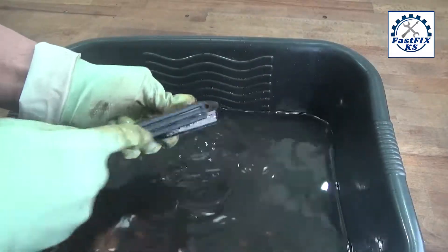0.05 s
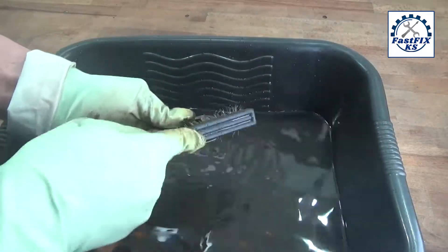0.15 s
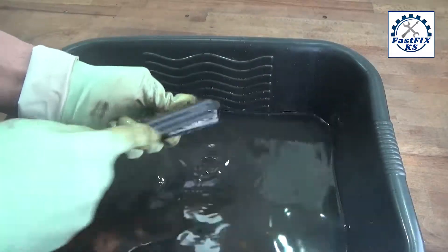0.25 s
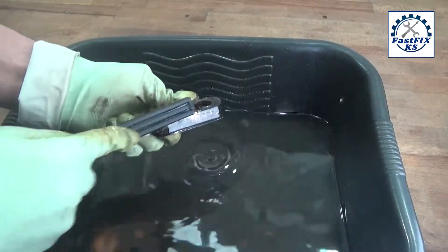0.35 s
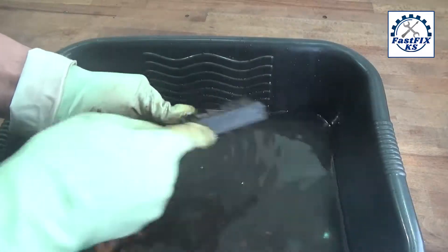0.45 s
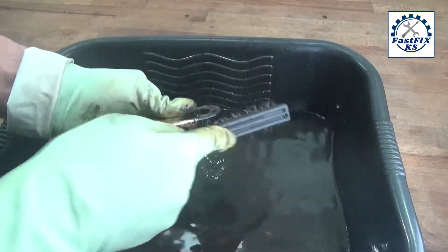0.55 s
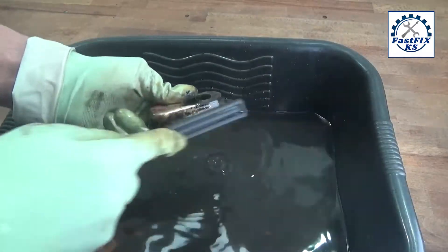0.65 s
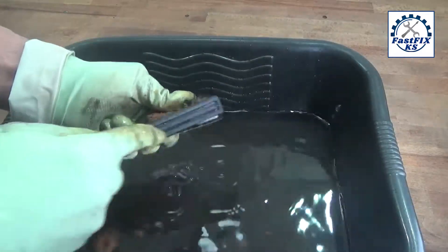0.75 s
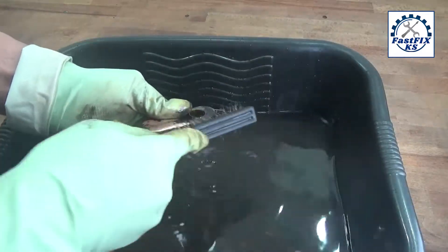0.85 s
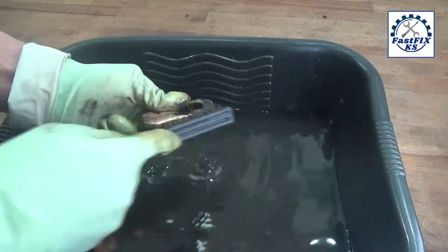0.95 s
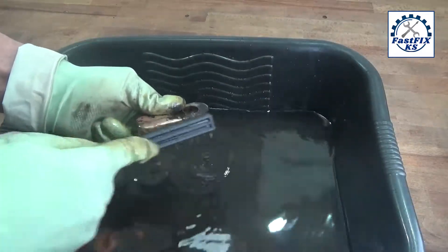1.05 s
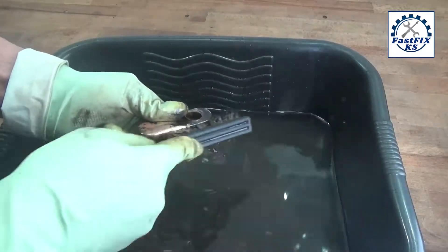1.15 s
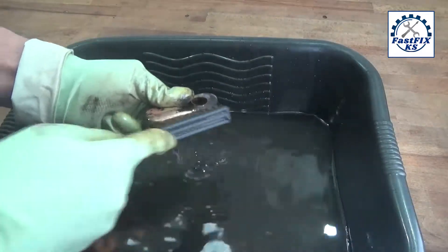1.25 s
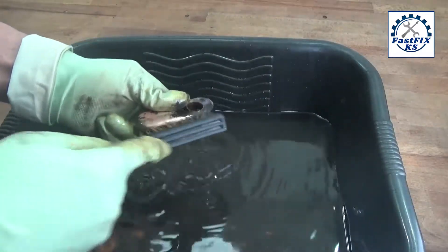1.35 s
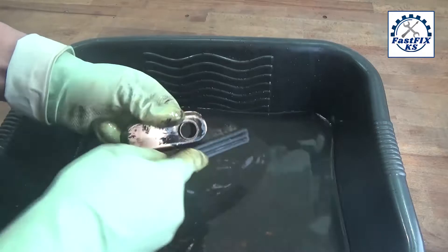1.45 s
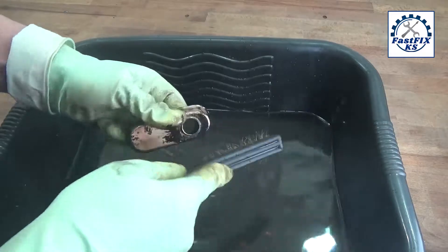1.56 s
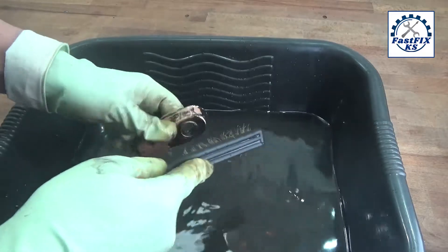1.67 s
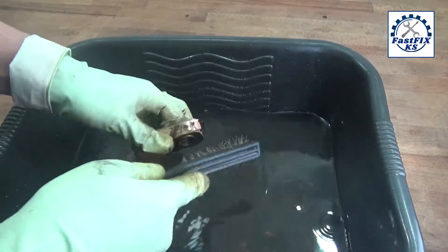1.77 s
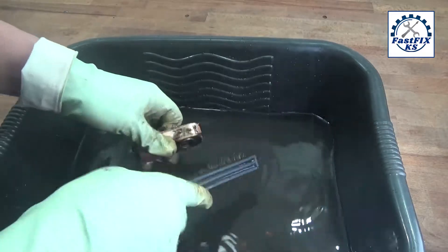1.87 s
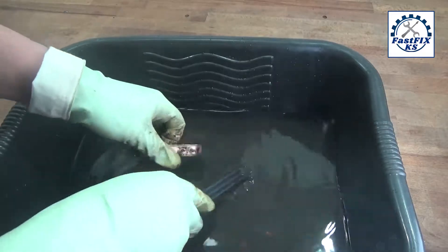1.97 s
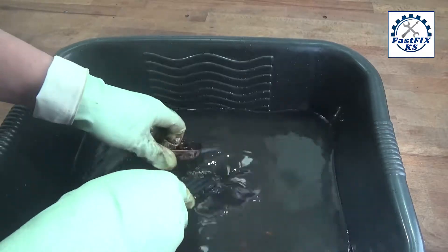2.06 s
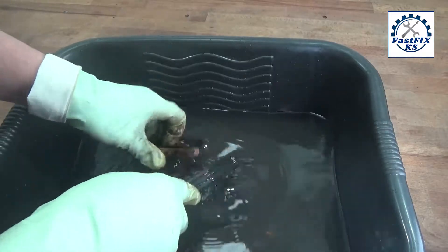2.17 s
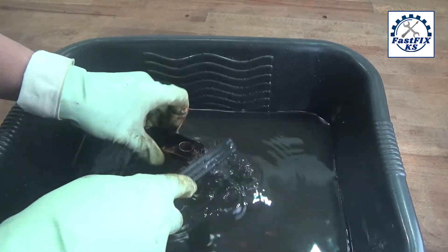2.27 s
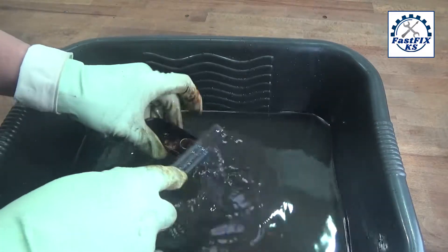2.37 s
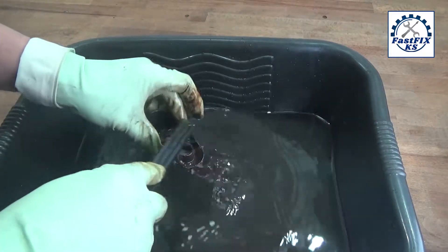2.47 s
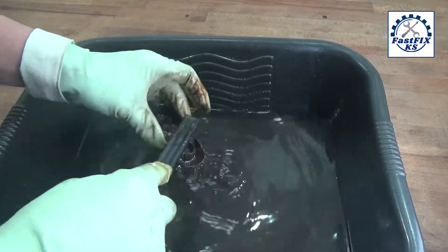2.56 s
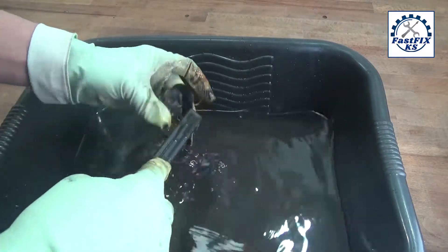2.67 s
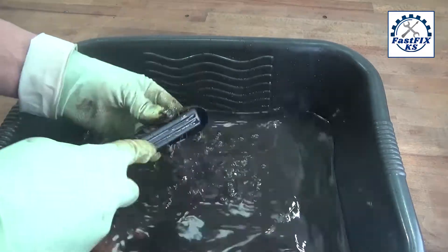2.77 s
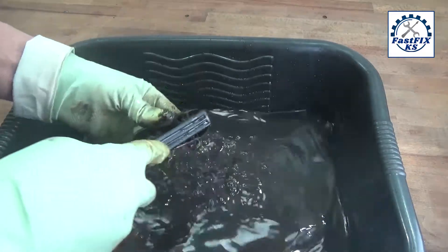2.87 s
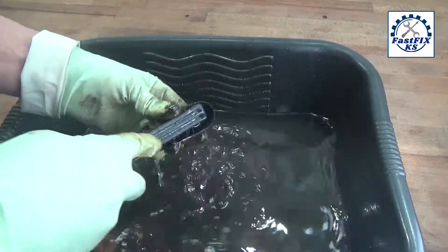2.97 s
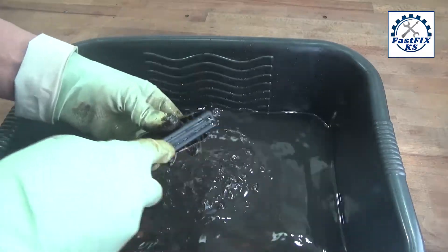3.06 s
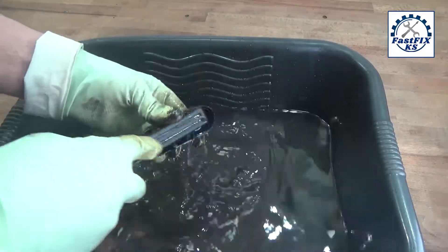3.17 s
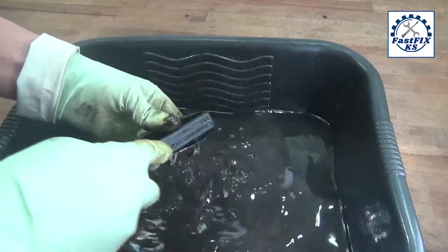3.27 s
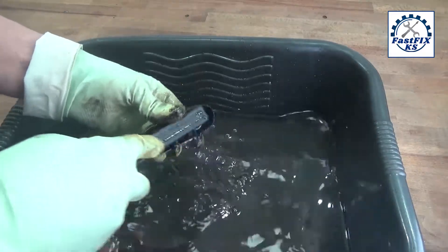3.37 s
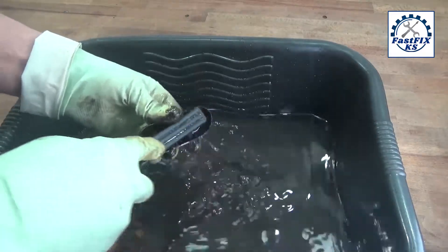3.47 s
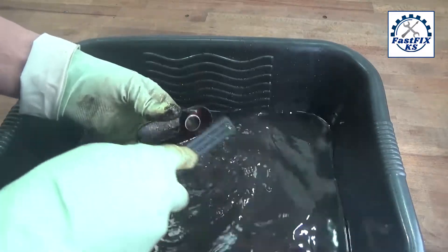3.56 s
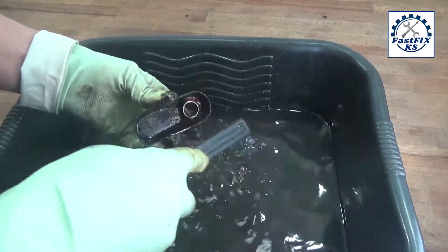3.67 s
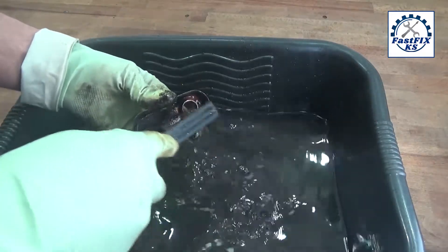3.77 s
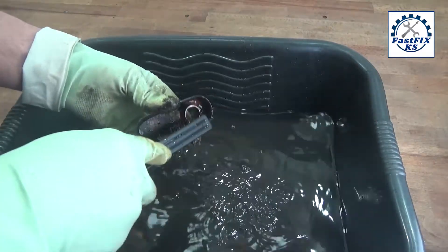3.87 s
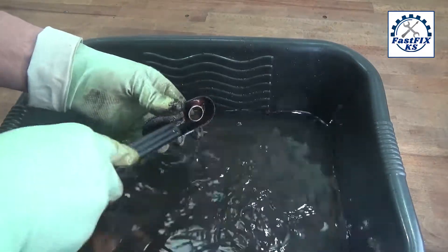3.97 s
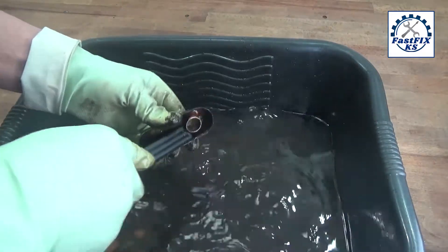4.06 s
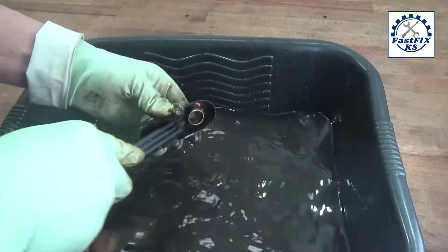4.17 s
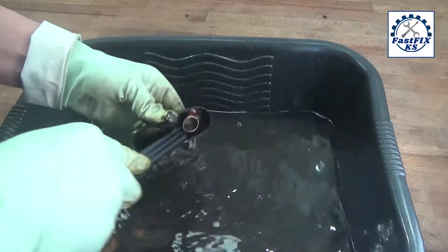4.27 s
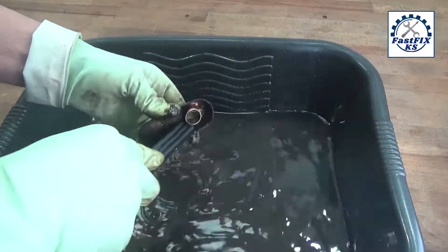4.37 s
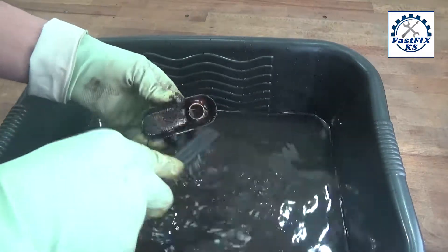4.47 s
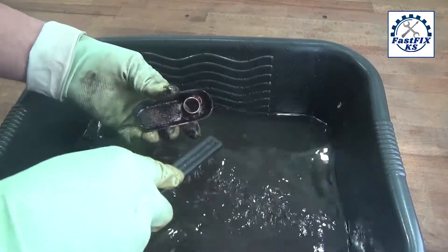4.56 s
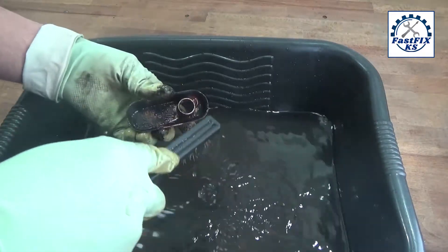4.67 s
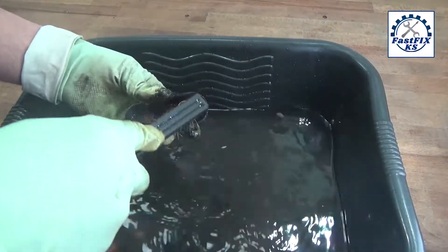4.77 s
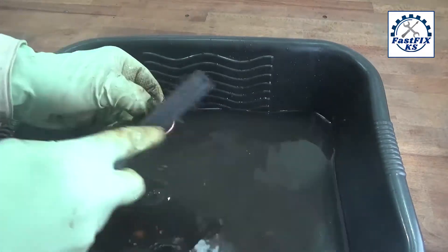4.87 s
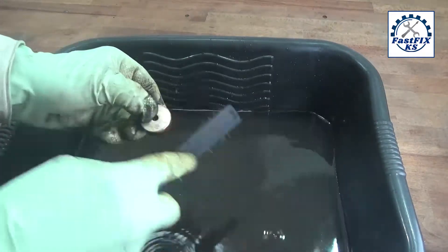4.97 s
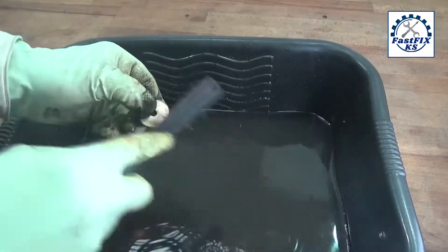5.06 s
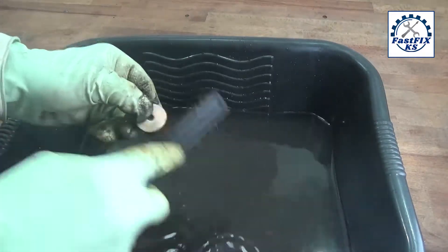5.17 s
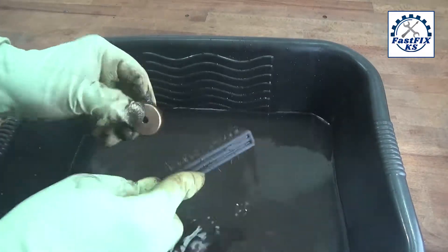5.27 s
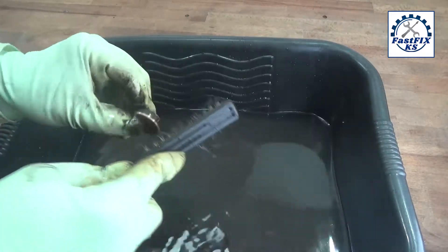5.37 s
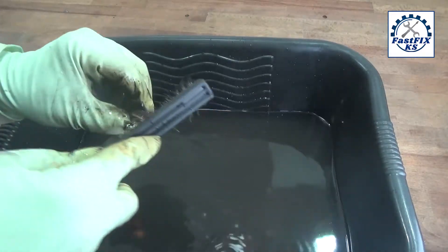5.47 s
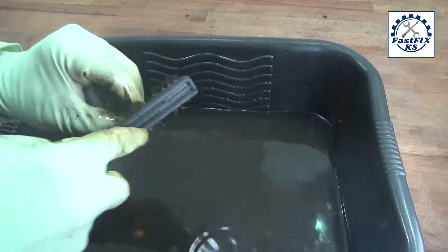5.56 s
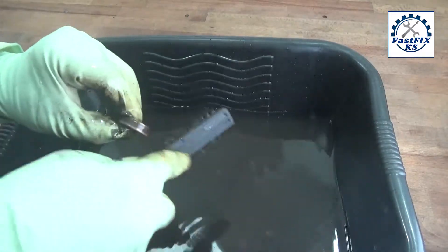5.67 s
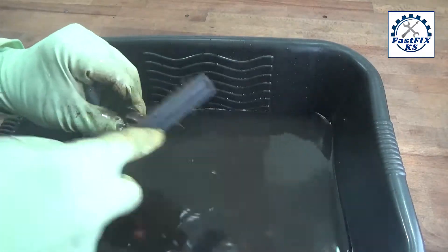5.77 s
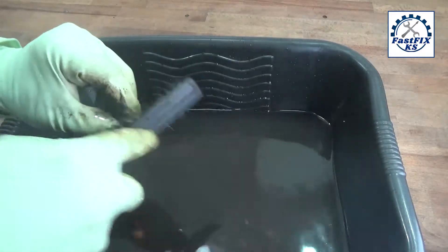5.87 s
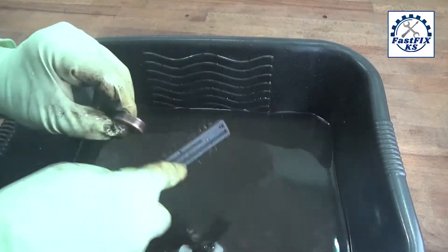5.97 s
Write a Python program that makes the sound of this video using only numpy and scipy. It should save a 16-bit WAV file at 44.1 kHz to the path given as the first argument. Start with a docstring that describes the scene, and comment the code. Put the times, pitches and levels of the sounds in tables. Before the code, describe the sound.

Close, dry scratching of wire bristles on rusty steel, with metallic knocks, brief watery blips and four bright separate scrapes at the end.

```python
"""Wire brush on rusty steel

Gloved hands scrub a steel lever with a wire brush over a plastic basin of water, close up in a small workshop.
Random wire flicks ring each part: the flat, the wet bored end, the rim, then four sweeps over a small washer,
with a faint, smooth glove rub between them. Short filtered bursts make the knocks; gliding tones the bubbles.
Filtered noise and tiny pings make water, gloves and bumps, over a short room tail and a faint hiss and hum."""
import sys
import numpy as np
from scipy import signal
from scipy.fft import rfft, irfft
from scipy.io import wavfile
from scipy.ndimage import map_coordinates

SR = 44100
rng = np.random.default_rng(int(sys.argv[2]) if len(sys.argv) > 2 else 0)


def unload_audio(sound):
    """Save the sound as a 16-bit wav file, at the path given as the first command line argument."""
    columns = np.transpose(np.atleast_2d(sound))
    # keep every value between -1 and 1, then stretch to whole-number steps
    steps = np.round(np.clip(columns, -1, 1) * 32767)
    wavfile.write(sys.argv[1], SR, steps.astype(np.int16))


N = 265482   # samples, about 6 s
TIME = np.arange(N) / SR


def scrub(gains, body, twangs, wander, twang_db, flicks_per_s, spread_db, tufts_per_s, tuft_db,
          hiss_trim_db, rasp_trim_db):
    """Wire tips catch on the rust and flick free, whole tufts at a time; the part rings with each flick."""
    flicks = grains(flicks_per_s, spread_db)
    # now and then a bent wire springs back and twangs at a pitch of its own
    wires = flicks / rms(flicks) + from_db(twang_db) * twangs
    tufts = from_db(tuft_db * flutter(tufts_per_s))
    scrape = waver(through(wires * tufts, body), wander, per_s=45)
    hiss = band(scrape, 4700, "high")
    rasp = band(scrape, 4700, "low")
    # fast travel brings out the hiss of the tips, hard pressing the rasp of the part
    travel, pressure = gains
    hiss = from_db(hiss_trim_db) * travel * hiss / rms(hiss)
    rasp = from_db(rasp_trim_db) * pressure * rasp / rms(rasp)
    return hiss + rasp


# In the tables of strokes, hiss is the high part of the scrape and rasp the low; scrub() trims both levels.
# strokes on the flat of the lever, then two faint, watery rustles before the bore strokes:
# start_s, length_s, hiss_db, rasp_db, hiss_fade_db (over the stroke)
FLAT_STROKES = [(-.04, 0.11, -24.5, -36, 6), (.079, 0.13, -23.5, -41.5, 12), (.238, 0.14, -21.5, -41.5, 20),
                (.398, 0.14, -34, -39, -0.5), (.764, 0.16, -29.5, -41, 6), (.951, 0.11, -29.5, -37.5, 3),
                (1.096, 0.11, -26, -36.5, 6.5), (1.244, 0.098, -27.5, -36, 4), (1.38, 0.16, -24, -35.5, 9),
                (2.578, 0.042, -37, -41, 7), (2.68, 0.075, -41, -40, -1)]
# colour of scraping on the flat: pitch_hz, level_db
FLAT_COLOUR = [(88, -36), (150, -40), (205, -27.5), (315, -29), (688, -16), (977, -16), (1720, -11),
               (3540, -6.5), (4140, -6.5), (4570, -6.5), (5770, -2.5), (6360, -1), (7440, 0.5), (9040, 0),
               (15900, -18)]
# resonances of the held flat: pitch_hz, width_hz, lift_db
FLAT_MODES = [(1310,54,6.5), (1740,210,5), (2500,14,7), (3020,88,7), (4170,120,4.5), (5840,240,6.5),
              (6920,130,0), (7100,59,-1), (7080,77,5), (7560,50,12), (8730,87,8.5), (9260,39,11.5)]


def brushed_flat(twangs):
    """The flat rings as the wires are pushed over it; two faint, watery rustles share its colour."""
    gains = strokes(FLAT_STROKES, attack_s=0.052, rasp_sag_db=2.0,
                    hiss_release_db_per_s=370, rasp_release_db_per_s=240)
    return scrub(gains, response(FLAT_COLOUR, FLAT_MODES), twangs, wander=0.00252, twang_db=-8,
                 flicks_per_s=14000, spread_db=3.5, tufts_per_s=260, tuft_db=0.8,
                 hiss_trim_db=-2.5, rasp_trim_db=-2.0)


# strokes on the wet bored end: start_s, length_s, hiss_db, rasp_db, hiss_fade_db (over the stroke)
BORE_STROKES = [(2.774, 0.064, -31.5, -31, 3), (2.866, 0.063, -37, -27.5, 3),
                (2.974, 0.067, -38, -31.5, -0.5), (3.073, 0.088, -34, -30, 2.5),
                (3.181, 0.075, -38, -28, -3.5), (3.285, 0.072, -35.5, -28.5, -3.5),
                (3.389, 0.085, -39.5, -29, -5.5), (3.505, 0.11, -34, -28, -4)]
# colour of scraping on the bored end, also used for knocked steel: pitch_hz, level_db
BORE_COLOUR = [(50,-36), (150,-27.5), (300,-25.5), (700,-17.5), (1400,-13), (1800,-2.5), (2400,4.5),
               (3050,-10.5), (4000,-4.5), (5400,-7), (6800,5), (9000,-5), (11000,-6), (13000,-11),
               (16000,-14)]
# resonances of the bored end: pitch_hz, width_hz, lift_db
BORE_MODES = [(1760,140,6), (2375,270,6.5), (2513,94,9.4), (2640,156,11.8), (3450,59,6.9), (4068,360,16.2),
              (6130,77,8.8), (7070,100,1.6), (9100,870,9.4)]


def brushed_bore(twangs):
    """The wet bored end rings strongly, its pitches wandering more than those of the flat."""
    gains = strokes(BORE_STROKES, attack_s=0.027, rasp_sag_db=4.0,
                    hiss_release_db_per_s=435, rasp_release_db_per_s=517, hollow_db=1.5)
    return scrub(gains, response(BORE_COLOUR, BORE_MODES), twangs, wander=0.014, twang_db=-7.0,
                 flicks_per_s=9000, spread_db=4.5, tufts_per_s=200, tuft_db=1.5,
                 hiss_trim_db=0.0, rasp_trim_db=0.5)


# strokes along the rim: start_s, length_s, hiss_db, rasp_db, hiss_fade_db (over the stroke)
RIM_STROKES = [(3.882, 0.015, -43.5, -47.5, 1), (3.941, 0.1, -38.5, -40.5, 1.5),
               (4.069, 0.044, -34.5, -33, 7), (4.197, 0.052, -39, -41.5, -3.5),
               (4.294, 0.091, -33, -40, 11.5), (4.452, 0.054, -40.5, -40.5, -7)]
# colour of scraping on the rim: pitch_hz, level_db
RIM_COLOUR = [(50,-30), (150,-34), (300,-25), (700,-13.5), (1150,-9.5), (1480,-11), (2300,-1.5), (3400,-5),
              (5400,-4), (8500,1), (11000,-6), (13000,-13), (16000,-17)]
# resonances of the rim: pitch_hz, width_hz, lift_db
RIM_MODES = [(1780,190,14), (2350,50,6.8), (2532,133,13.2), (2716,99,13.7), (4100,57,17.3), (6000,61,1.4),
             (7440,120,2), (8300,53,2)]


def brushed_rim(twangs):
    """Strokes along the rim ring at narrow resonances of their own."""
    gains = strokes(RIM_STROKES, attack_s=0.032, rasp_sag_db=-1.0,
                    hiss_release_db_per_s=308, rasp_release_db_per_s=200)
    return scrub(gains, response(RIM_COLOUR, RIM_MODES), twangs, wander=0.01784, twang_db=-6.5,
                 flicks_per_s=8000, spread_db=2.0, tufts_per_s=290, tuft_db=2.0,
                 hiss_trim_db=0.0, rasp_trim_db=0.5)


# four sweeps across the washer; the third of the five rows is a faint, smooth glove rub between them:
# start_s, time_to_full_speed_s, swell_s, hiss_db, rasp_db, landing_db
WASHER_SWEEPS = [(4.942, .076, 0.015, -24.5, -31, -34), (5.157, 0.084, 0.015, -25, -35, -39),
                 (5.385, 0.07, 0.034, -63, -51.5, -65), (5.598, 0.079, 0.023, -29.5, -34, -45.5),
                 (5.879, 0.078, 0.018, -29.5, -30.5, -38)]
# colour of scraping on the washer: pitch_hz, level_db
WASHER_COLOUR = [(88, -63), (150, -36), (503, -14.5), (555, -15), (977, -13), (1120, -6), (1530, -9),
                 (2010, -2), (2260, -6.5), (2540, -2), (3480, -6), (9220, 7.5), (13900, -1.5), (15900, -13)]
# resonances of the washer: pitch_hz, width_hz, lift_db
WASHER_MODES = [(1150,120,1.5), (2110,140,4.8), (2750,530,1.5), (4600,120,2.4), (6160,43,6.6),
                (6770,93,5.9), (7200,70,3.3), (9580,200,6)]


def swept_washer(twangs):
    """One-way sweeps make the small washer ring in quick swells; a faint glove rub shares its colour."""
    gains = sweeps(WASHER_SWEEPS, landing_s=.004, settle_db_per_s=336,
                   landing_rasp_db=-0.4, rasp_lead_s=0.014)
    return scrub(gains, response(WASHER_COLOUR, WASHER_MODES), twangs, wander=.004, twang_db=-10.0,
                 flicks_per_s=17000, spread_db=4.0, tufts_per_s=270, tuft_db=2.5,
                 hiss_trim_db=-2.7, rasp_trim_db=-0.7)


def push(s, length, attack_s, sag_db, release_db_per_s, hollow_db=0):
    """Gain of one push of the hand: it builds, sags (and eases midway) while it lasts, then dies away."""
    t = TIME - s
    travelled = np.clip(t / length, 0, 1)
    sag = sag_db * travelled   # a negative sag grows instead
    easing = hollow_db * np.sin(np.pi * travelled) ** 2
    release = release_db_per_s * np.maximum(t - length, 0)
    onset = np.sin(np.pi / 2 * np.clip(t / attack_s, 0, 1)) ** 2
    return onset * from_db(np.maximum(-sag - easing - release, -120))


def strokes(rows, attack_s, rasp_sag_db, hiss_release_db_per_s, rasp_release_db_per_s, hollow_db=0):
    """Gains of hiss and rasp for back-and-forth strokes; the hiss follows the speed of the hand."""
    hiss_power = rasp_power = 0
    for s, length, hiss_db, rasp_db, fade_db in rows:
        hiss_push = push(s, length, attack_s, fade_db, hiss_release_db_per_s, hollow_db)
        rasp_push = push(s, length, attack_s, rasp_sag_db, rasp_release_db_per_s, hollow_db)
        hiss_power = hiss_power + (from_db(hiss_db) * hiss_push) ** 2
        rasp_power = rasp_power + (from_db(rasp_db) * rasp_push) ** 2
    return np.sqrt(hiss_power), np.sqrt(rasp_power)


def sweeps(rows, landing_s, settle_db_per_s, landing_rasp_db, rasp_lead_s):
    """Gains for one-way sweeps: the brush lands, speeds up and lifts off; pressure peaks before speed."""
    hiss_power = rasp_power = 0
    for s, crest_s, swell_s, hiss_db, rasp_db, landing_db in rows:
        landing = from_db(landing_db) * push(s, landing_s, landing_s, 0, settle_db_per_s)
        touching = TIME > s
        past_crest = TIME - s - crest_s
        speed = touching * np.exp(-abs(past_crest) / swell_s)
        pressure = touching * np.exp(-abs(past_crest + rasp_lead_s) / swell_s)
        hiss_power = hiss_power + landing ** 2 + (from_db(hiss_db) * speed) ** 2
        landing_rasp = from_db(landing_rasp_db) * landing
        rasp_power = rasp_power + landing_rasp ** 2 + (from_db(rasp_db) * pressure) ** 2
    return np.sqrt(hiss_power), np.sqrt(rasp_power)


def waver(x, depth, per_s):
    """The water film and the pressing brush load the steel, so its resonances wander."""
    # reading slightly faster or slower bends every pitch; depth is the typical fraction of speed
    position = np.arange(N) + np.cumsum(depth * flutter(per_s))
    return map_coordinates(x, [position], mode="grid-wrap")


# brush and fingers knocking on the parts: start_s, steel_ring_db, wire_tick_db, dull_clack_db (before trims)
KNOCKS = [(.266, -48, -14, -50), (.542, -58, -10, -46), (.768, -46, -9.5, -36), (1.49, -45, -39, -11),
          (1.53, -42, -23, -8.5), (1.652, -55, -35, -29), (1.68, -41, -35, -27), (1.734, -41, -44, -12.5),
          (1.801, -39, -28, -47), (2.041, -40, -9.5, -23), (2.104, -21, -14.5, -22), (2.16, -55, -21, -52),
          (2.546, -29, -11.5, -44), (2.707, -30, -37, -22), (2.902, -24, -12, -37),
          (3.829, -34.5, -28.5, -62), (3.996, -11, -37, -40), (4.056, -24, -12, -28),
          (4.101, -21, -23, -20), (4.123, -20.5, -39, -8), (4.188, -34, -19, -32), (4.359, -14, -27, -17.5),
          (4.502, -15, -28, -28), (4.508, -13.5, -21, -13.5), (4.898, -46, -27.5, -33.5)]
# colour of the ticking wires: pitch_hz, level_db
TICK_COLOUR = [(60,-45), (300,-15), (1500,-35), (4000,0), (6500,13), (9000,14), (12000,3.5), (16000,-14.5)]
# colour of the clacking brush head: pitch_hz, level_db
CLACK_COLOUR = [(50,-33), (230,-40), (500,-7), (950,-8), (1850,7), (3000,10.5), (5000,-12), (16000,-56)]
# resonance of the brush head: pitch_hz, width_hz, lift_db
CLACK_MODES = [(1850,300,7.5)]


def knocks(rattle_db, rattle_t60_s, contact_hz, ring_trim_db, tick_trim_db, clack_trim_db):
    """A contact rings the steel, ticks the wires and clacks the brush head, with a brief rattle after it."""
    softened = signal.butter(2, contact_hz, fs=SR, output="sos")
    steel = signal.sosfilt(softened, response(BORE_COLOUR, BORE_MODES))
    wires = response(TICK_COLOUR)
    head = response(CLACK_COLOUR, CLACK_MODES)
    out, t = np.zeros(N), TIME[:len(wires)]
    for s, ring_db, tick_db, clack_db in [*KNOCKS, *bites(), *skitter(count=4)]:
        parts = ((steel, ring_db + ring_trim_db), (wires, tick_db + tick_trim_db),
                 (head, clack_db + clack_trim_db))
        for body, peak_db in parts:
            rattle = from_db(rattle_db - 60 * t / rattle_t60_s) * rng.standard_normal(len(t))
            # light touches hardly rattle
            contact = (t == 0) + rattle * from_db(0.34 * (tick_db + 17.5))
            hit = through(contact, body)
            add(out, s, from_db(peak_db) * hit / np.abs(hit).max())
    return out


# each bore stroke catches the near edge, then the far edge as it turns round;
# dB relative to the stroke's own table levels, before the knock trims
BITE_AFTER_S, BITE_RING_DB, BITE_TICK_DB, BITE_CLACK_DB = 0.023, 5, 14, -18
TURN_RING_DB, TURN_TICK_DB, TURN_CLACK_DB = 6, 19.5, -16


def bites():
    """Knocks of the brush against the edges of the bore, early in every stroke and at its end."""
    rows = []
    for s, length, hiss_db, rasp_db, fade_db in BORE_STROKES:
        rows.append((s + BITE_AFTER_S, rasp_db + BITE_RING_DB,
                     hiss_db + BITE_TICK_DB, rasp_db + BITE_CLACK_DB))
        rows.append((s + length, rasp_db + TURN_RING_DB,
                     hiss_db - fade_db + TURN_TICK_DB, rasp_db + TURN_CLACK_DB))
    return rows


# the wires skip off the dipping lever; levels of the first knock, before the knock trims
SKITTER_S, SKITTER_GAP_S, SKITTER_STEP_DB = 2.049, 0.0033, 0.8
SKITTER_RING_DB, SKITTER_TICK_DB, SKITTER_CLACK_DB = -46, -13, -27.5


def skitter(count):
    """A quick run of skipping knocks, each slightly louder than the last."""
    first = np.array([SKITTER_RING_DB, SKITTER_TICK_DB, SKITTER_CLACK_DB])
    return [(SKITTER_S + k * SKITTER_GAP_S, *(first + k * SKITTER_STEP_DB)) for k in range(count)]


def after_ring(s, hz, level_db, t60_s):
    """The lever sings on briefly, as one fading tone, as the brush slips off its end."""
    out, t = np.zeros(N), TIME[:SR // 4]
    add(out, s, from_db(level_db - 60 * t / t60_s) * np.sin(2 * np.pi * hz * t))
    return out


# bubbles and films of water popping in the bore:
# start_s, pitch_hz, level_db (before swell and decay), rise_octaves_per_s (negative falls)
BUBBLES = [(2.174, 2750, -38.5, 14), (2.208, 1400, -39.5, 27.5), (2.209, 2100, -34, 0),
           (2.311, 1150, -43, -0.5), (2.353, 1190, -47.5, -2), (2.373, 2960, -39.5, 18),
           (2.426, 1150, -44.5, 9.5), (2.454, 1156, -46, 3.5), (2.465, 2700, -39.5, 8),
           (2.477, 1370, -44.5, 4), (2.531, 1187, -46.5, 8), (4.237, 3100, -27, -18.5),
           (4.272, 3620, -29, -3)]
BUBBLE_CYCLES = 142   # cycles of the starting pitch to fade by 60 dB


def bubbles(swell_s, wobble_octaves, wobbles_per_s):
    """Trapped bubbles ring and wobble; most climb in pitch near the surface, and small ones die sooner."""
    out, t = np.zeros(N), TIME[:SR // 5]
    wobble = wobble_octaves * flutter(wobbles_per_s)
    for s, hz, db, rise in BUBBLES:
        octaves = np.minimum(rise * t, 1) + np.interp(s + t, TIME, wobble)
        phase = 2 * np.pi * np.cumsum(hz * 2 ** octaves) / SR
        decay = from_db(db - 60 * t * hz / BUBBLE_CYCLES)
        add(out, s, decay * (1 - np.exp(-t / swell_s)) * np.sin(phase))
    return out


# water stirred by the dipped lever: start_s, length_s, level_db (before the trim)
SLOSH = [(2.085, 0.026, -44), (2.19, 0.11, -54), (2.285, 0.061, -48.5), (2.41, 0.095, -55),
         (2.525, 0.058, -51.5)]
# colour of moving water, also used for wet gloves: pitch_hz, level_db
WATER_COLOUR = [(50,-31), (150,-25), (500,-8.5), (900,-7.5), (2000,5.5), (4000,1), (9000,-3), (12000,-11),
                (16000,-32)]


def slosh(drops_per_s, spread_db, cycles, wash_db, trim_db):
    """Tiny droplets ring over a soft wash of noise."""
    drops = pings(550, 9000, drops_per_s, spread_db, cycles, count=18)
    wash = from_db(wash_db) * rng.standard_normal(N)
    water = through(drops + wash, response(WATER_COLOUR))
    stirring = swells(SLOSH, attack_s=0.016, release_db_per_s=244)
    return from_db(trim_db) * stirring * water / rms(band(water, [800, 5000], "band"))


# colour of the bursting surface bubbles: pitch_hz, level_db
SPRAY_COLOUR = [(100,-40), (2000,-11), (5000,-7), (9000,0), (13000,5.5), (16000,-7)]
DIP_START_S, DIP_END_S = 2.13, 2.62


def spray(loudest_db, spread_db, cycles, count):
    """While the lever is dipped, tiny bubbles burst at the surface as lone, high ticks."""
    out, t = np.zeros(N), TIME[:SR // 50]
    for when, softness, pitch in rng.random((count, 3)):
        hz = 4000 * 3.3 ** pitch
        tick = np.sin(2 * np.pi * hz * t) * from_db(-60 * t * hz / cycles)
        start_s = DIP_START_S + when * (DIP_END_S - DIP_START_S)
        add(out, start_s, from_db(loudest_db - spread_db * softness) * tick)
    return through(out, response(SPRAY_COLOUR))   # the colour reshapes the tick levels


# wet rubber gloves shifting their grip: start_s, length_s, level_db (before the trim)
GLOVES = [(.57, 0.16, -58), (.7, 0.041, -52), (1.675, 0.043, -51), (1.727, 0.011, -46.5),
          (1.79, 0.15, -63.5), (1.98, 0.032, -53.5)]


def gloves(rub_per_s, rub_db, trim_db):
    """Wet rubber slides over the steel with a soft, uneven rustle."""
    rubbing = from_db(rub_db * flutter(rub_per_s))
    rustle = through(rng.standard_normal(N) * rubbing, response(WATER_COLOUR))
    sliding = swells(GLOVES, attack_s=0.0083, release_db_per_s=159)
    return from_db(trim_db) * sliding * rustle / rms(band(rustle, [800, 5000], "band"))


def swells(rows, attack_s, release_db_per_s):
    """Gain of a series of soft, even movements."""
    power = 0
    for s, length, db in rows:
        power = power + (from_db(db) * push(s, length, attack_s, 0, release_db_per_s)) ** 2
    return np.sqrt(power)


# dull bumps of the gloves and the water in the basin: start_s, pitch_hz, peak_db (before the trim)
BUMPS = [(.08, 230, -56), (.53, 500, -42.5), (1.151, 240, -48.5), (1.478, 606, -38), (2.088, 205, -51.5),
         (2.369, 150, -54.5), (2.541, 157, -61), (2.778, 470, -42), (2.784, 222, -50), (4.118, 710, -37),
         (4.146, 284, -44), (4.585, 280, -48), (5.743, 230, -55.5), (5.858, 416, -42), (5.868, 1120, -32)]
BUMP_MID_HZ = 280   # bumps lower than this last longer, higher ones are shorter


def bumps(swell_s, half_width_octaves, trim_db):
    """Soft thuds of filtered noise that swell and die away."""
    out, t = np.zeros(N), TIME[:SR // 4]
    for s, hz, db in BUMPS:
        edges = [hz / 2 ** half_width_octaves, hz * 2 ** half_width_octaves]
        sos = signal.butter(2, edges, "band", fs=SR, output="sos")
        swell = t * np.exp(-t / swell_s * np.sqrt(hz / BUMP_MID_HZ))
        thud = signal.sosfilt(sos, rng.standard_normal(len(t)) * swell)
        add(out, s, from_db(db + trim_db) * thud / np.abs(thud).max())
    return out


ROOM_T60_S, ROOM_DB = 0.16, -12


def workshop(x, wall_hz, first_echo_s, width_db):
    """A short diffuse tail; long waves reach both ears alike, short ones differ."""
    t = TIME[:SR // 2]
    tails = rng.standard_normal((2, len(t))) * from_db(-60 * t / ROOM_T60_S) * (t > first_echo_s)
    mid, side = signal.sosfilt(signal.butter(2, wall_hz, fs=SR, output="sos"), tails)
    side = from_db(width_db) * band(side, 280, "high")
    ears = (mid + side, mid - side)
    return from_db(ROOM_DB) * np.array([through(x, tail / np.sqrt(np.sum(tail ** 2))) for tail in ears])


# colour of the still workshop: pitch_hz, level_db
AIR = [(18, -80), (30, -28), (145, -20), (272, -11.5), (448, -7), (511, -6), (631, -5), (935, -6),
       (1180, -2.5), (1350, -6), (1620, -8.5), (2000, -6), (7640, -11), (15900, -24)]
# hum of the workshop: pitch_hz, width_hz, lift_db
AIR_MODES = [(62,17,16), (150,11,3), (248.5,16,11)]
AIR_DB = -63   # rms of the part shared by both ears


def air(side_db):
    """Faint steady noise, with narrow peaks for hum, much alike at both ears."""
    mid = through(rng.standard_normal(N), response(AIR, AIR_MODES, size=16384))
    side = through(rng.standard_normal(N), response(AIR))
    ears = mid + from_db(side_db) * side * np.array([[1], [-1]])
    return from_db(AIR_DB) * ears / rms(mid)


def from_db(db):
    """Turn decibels into a gain."""
    return 10 ** (np.asarray(db) / 20)


def rms(x):
    """Average strength of a signal."""
    return np.sqrt(np.mean(x ** 2) + 1e-20)


def band(x, edges, kind):
    """Butterworth filter."""
    return signal.sosfilt(signal.butter(4, edges, kind, fs=SR, output="sos"), x)


def response(colour, modes=(), size=4096):
    """Causal impulse response with a broad colour and resonant peaks."""
    hz = np.fft.rfftfreq(size, 1 / SR) + 1
    points = np.array(colour)
    db = np.interp(np.log(hz), np.log(points[:, 0]), points[:, 1])
    for centre, width, lift in modes:
        db = db + lift / (1 + (2 * (hz - centre) / width) ** 2)
    # folding the cepstrum gives minimum phase: the sound starts at once
    cepstrum = irfft(np.log(from_db(db)))
    cepstrum[1:size // 2] *= 2
    cepstrum[size // 2 + 1:] = 0
    return irfft(np.exp(rfft(cepstrum)))


def through(x, impulse):
    """Pass a signal through a resonant body."""
    return signal.fftconvolve(x, impulse)[:len(x)]


def add(out, s, sound):
    """Mix a sound in at a time."""
    start = max(round(s * SR), 0)
    out[start:start + len(sound)] += sound[:N - start]


def flutter(per_s):
    """Random wobble of rms 1, with straight lines between its turning points."""
    knots = np.arange(0, N / SR + 1, 1 / per_s)
    wobble = np.interp(TIME, knots, rng.standard_normal(N)[:len(knots)])
    return wobble / rms(wobble)


def grains(per_s, spread_db):
    """Random clicks of uneven size and sign."""
    sizes = from_db(spread_db * np.minimum(rng.exponential(1, N), 4))
    return sizes * rng.choice([-1, 1], N) * (rng.random(N) < per_s / SR)


def pings(low_hz, high_hz, per_s, spread_db, cycles, count):
    """Random clicks at each of several resonators spread in pitch, which ring for some cycles; rms 1."""
    out = 0
    for hz in np.geomspace(low_hz, high_hz, num=count):
        r = from_db(-60 * hz / (cycles * SR))   # loss per sample
        w = 2 * np.pi * hz / SR
        clicks = grains(per_s, spread_db) + 1e-18   # the tiny offset keeps the filter from stalling
        ringing = signal.lfilter([1, 0, -1], [1, -2 * r * np.cos(w), r * r], clicks)
        out = out + ringing * np.sqrt(w)
    return out / rms(out)


def panned(x, left_db):
    """Place a source left or right by level."""
    return x * from_db(np.array([[left_db], [-left_db]]) / 2)


def scene():
    """Brushing, knocks and water, close to the microphone in a small room."""
    twangs = pings(low_hz=2112, high_hz=11170, per_s=45, spread_db=5.0, cycles=64, count=40)
    brushing = panned(brushed_flat(twangs), left_db=0.25) + panned(brushed_bore(twangs), left_db=0.0)
    brushing = brushing + panned(brushed_rim(twangs), left_db=0.3)
    brushing = brushing + panned(swept_washer(twangs), left_db=1.0)
    contacts = knocks(rattle_db=-17.5, rattle_t60_s=0.028, contact_hz=3660,
                      ring_trim_db=-4.0, tick_trim_db=-9.0, clack_trim_db=-10.0)
    contacts = contacts + after_ring(s=1.53, hz=4230, level_db=-40, t60_s=0.2)
    water = bubbles(swell_s=0.0022, wobble_octaves=0.049, wobbles_per_s=400)
    water = water + slosh(drops_per_s=45, spread_db=3.5, cycles=50, wash_db=3, trim_db=-2.5)
    water = water + spray(loudest_db=-27.5, spread_db=34, cycles=33, count=26)
    rustle = gloves(rub_per_s=140, rub_db=3.1, trim_db=-0.5)
    thuds = bumps(swell_s=0.022, half_width_octaves=0.35, trim_db=-7.5)
    direct = brushing + contacts + water + rustle + thuds
    room = workshop(direct.mean(axis=0), wall_hz=9500, first_echo_s=0.0033, width_db=-6.0)
    return direct + room + air(side_db=-7.5)


CUTOFF_HZ = 15900


def record(dry):
    """The top is cut steeply."""
    return signal.sosfilt(signal.ellip(12, .1, 90, CUTOFF_HZ, fs=SR, output="sos"), dry)


dry = scene()
out = record(dry)
unload_audio(out)
```